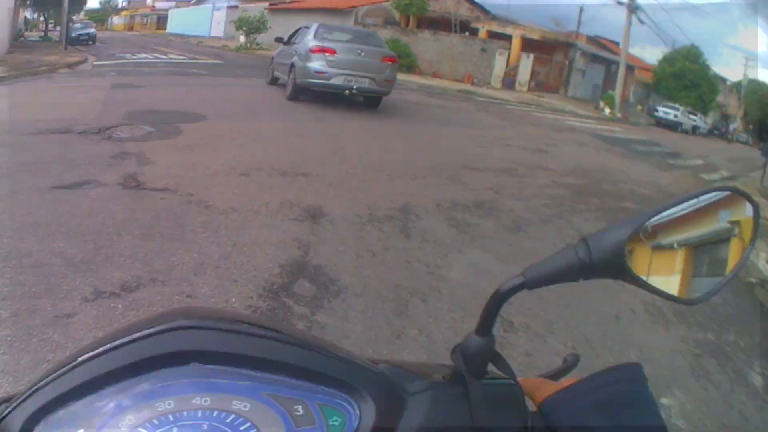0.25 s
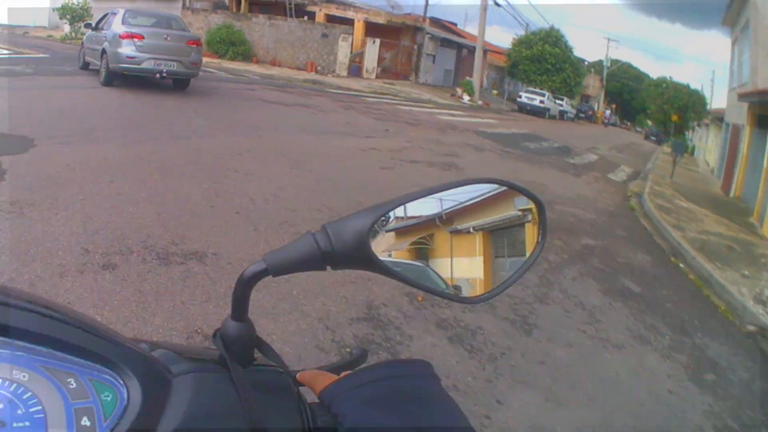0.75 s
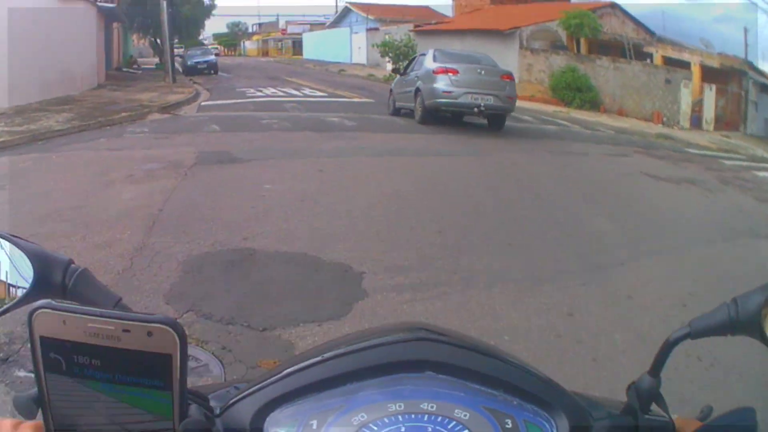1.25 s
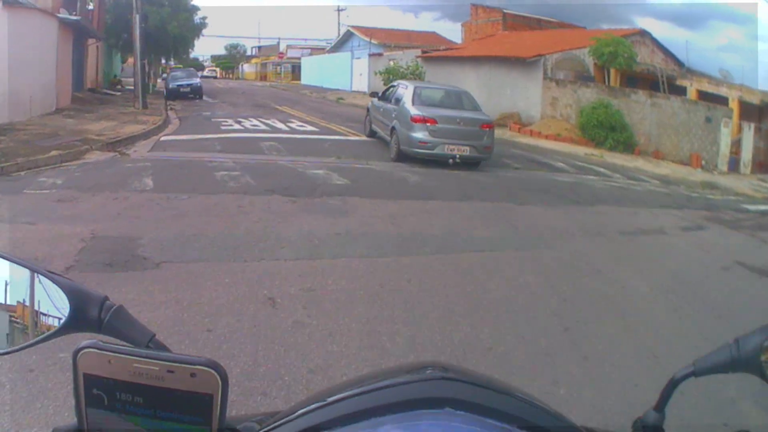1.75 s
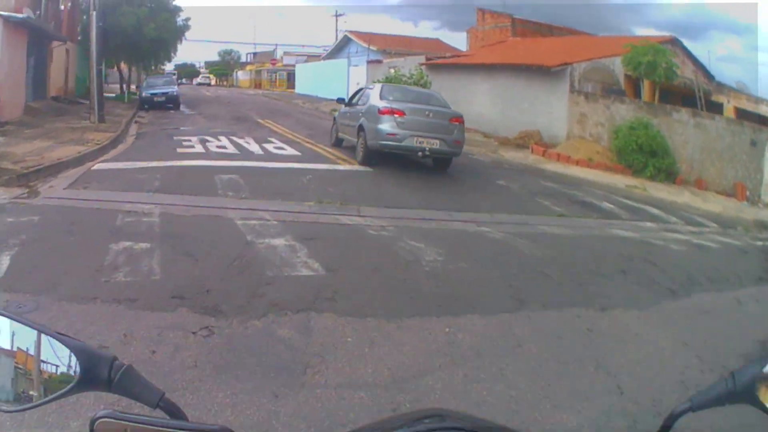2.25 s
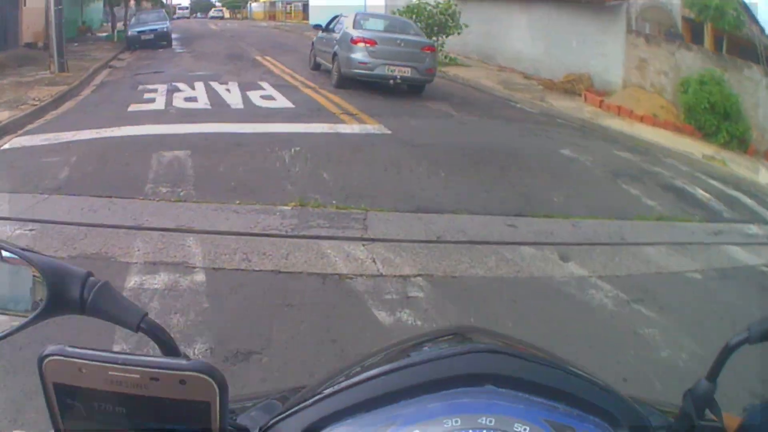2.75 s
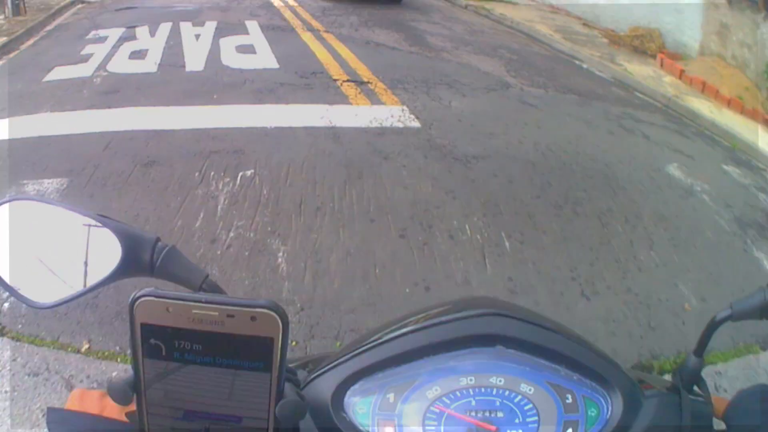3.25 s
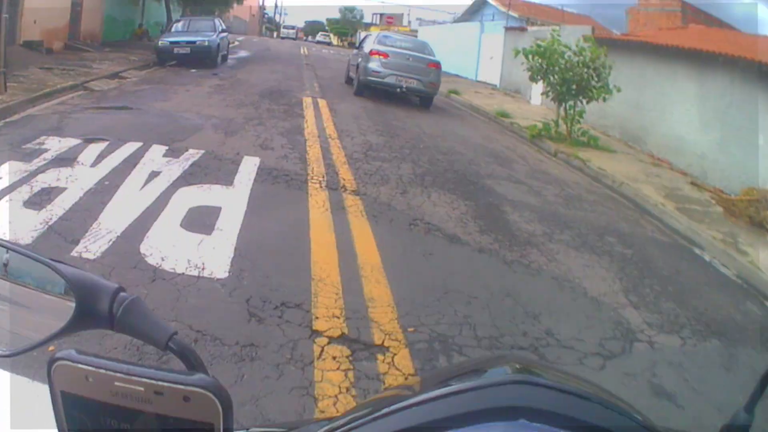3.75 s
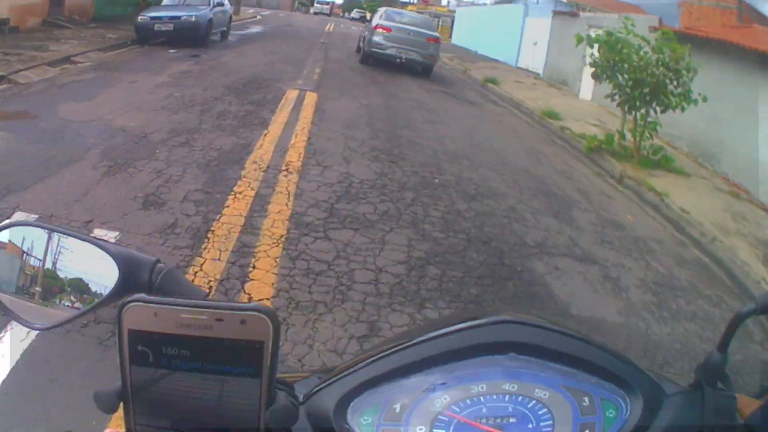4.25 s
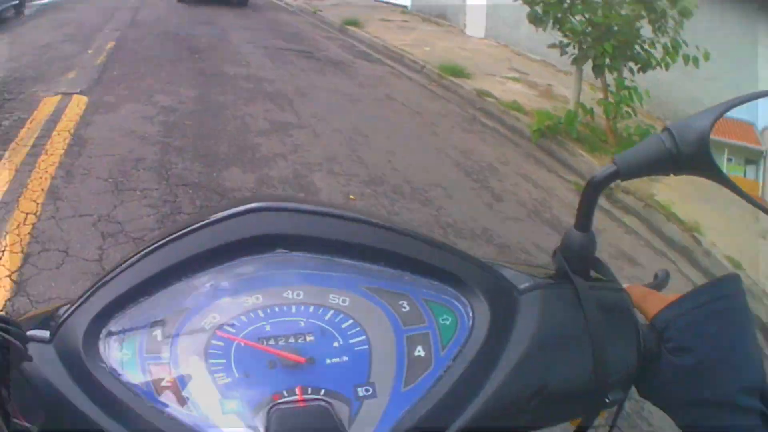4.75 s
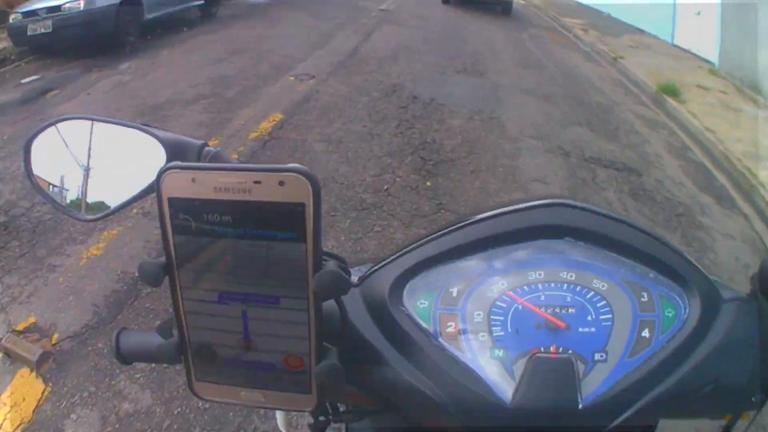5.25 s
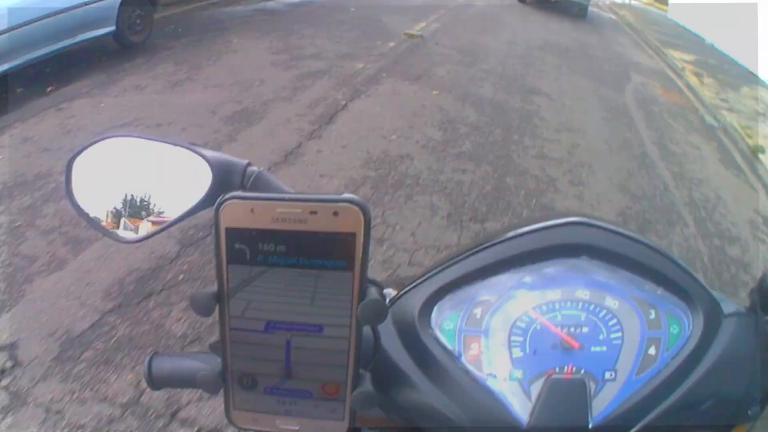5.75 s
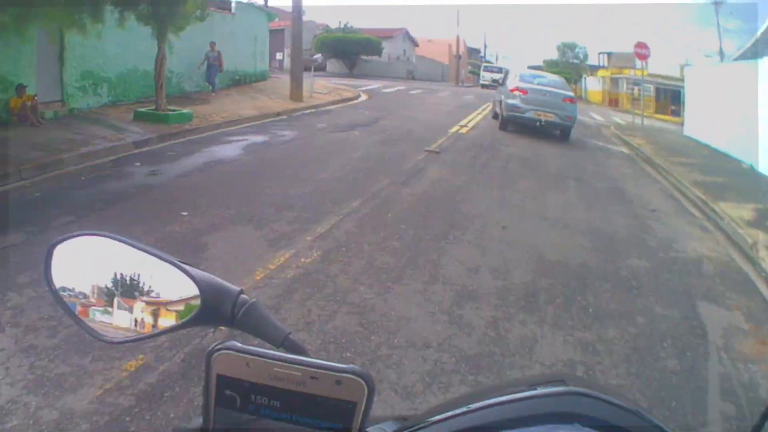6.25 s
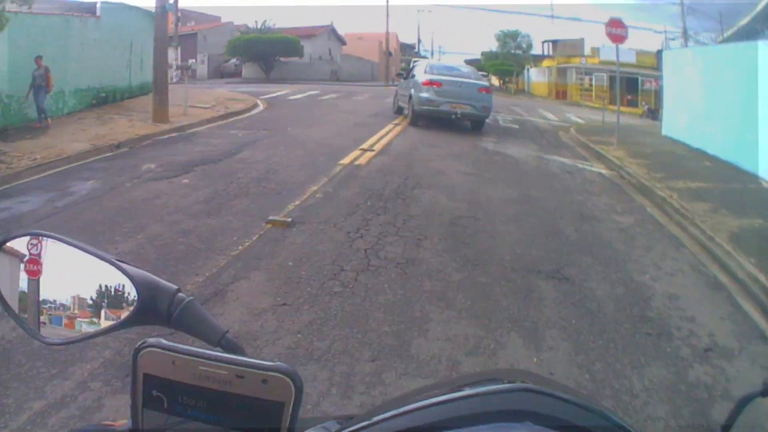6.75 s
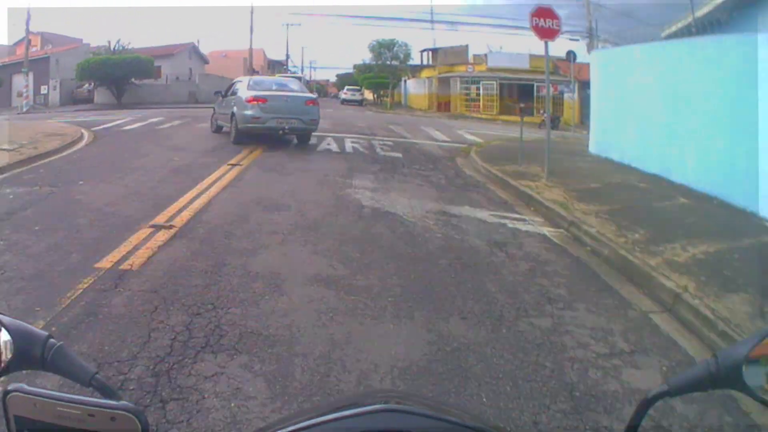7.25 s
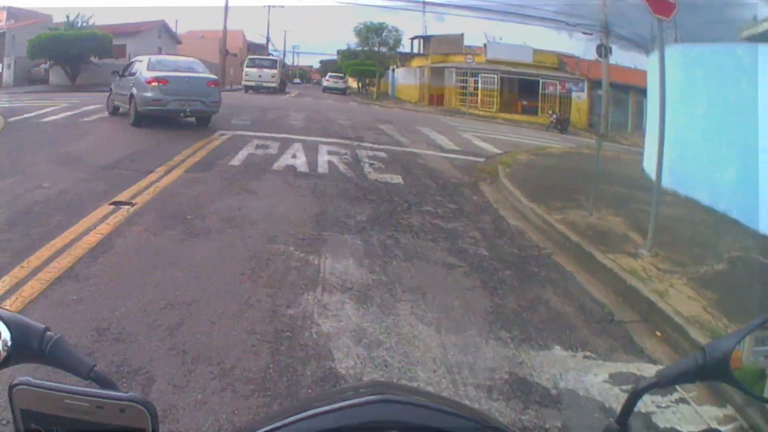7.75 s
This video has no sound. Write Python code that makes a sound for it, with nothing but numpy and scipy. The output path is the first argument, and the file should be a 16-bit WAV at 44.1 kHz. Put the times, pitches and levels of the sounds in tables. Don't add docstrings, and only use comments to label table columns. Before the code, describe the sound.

Close, dull onboard sound on an open residential street: low rapid exhaust thumps with rattling panels and thin metallic ringing. The scooter cruises, eases off, knocks once over a bump, then accelerates strongly with a nasal intake roar and gear whine up to a peak. It abruptly closes down, slows, briefly picks up and sputters irregularly, with soft rushing air throughout.

```python
import sys
import numpy as np
from scipy import signal
from scipy.io import wavfile
from scipy.ndimage import uniform_filter1d

SR = 44100
rng = np.random.default_rng(int(sys.argv[2]) if len(sys.argv) > 2 else 0)


def attenuation_scalar(level_db):
    decades = np.asarray(level_db, float) / 20
    return 10 ** decades


def to_wav(s):
    ch = np.atleast_2d(s).T
    pcm = np.round(np.clip(ch, -1, 1) * 32767)
    wavfile.write(sys.argv[1], SR, pcm.astype(np.int16))


N = 352359
MUFFLE_HZ = 3240


def steady(x, size=6000):
    power = uniform_filter1d(uniform_filter1d(x ** 2, size), size)
    return x / np.sqrt(power + 1e-12)


def in_time(rows):
    s, value = np.transpose(rows)
    return np.interp(np.arange(N) / SR, s, value)


def bumps(rows):
    t = np.arange(N) / SR
    return sum(height * np.exp(-.5 * ((t - s) / width) ** 2) for s, height, width in rows)


def drift(rate):
    r = np.exp(-80 * np.pi * rate / SR)
    slow = signal.lfilter([1], [1, -2 * r, r * r], rng.standard_normal(N // 40 + 2002))[2000:]
    return np.interp(np.arange(N) / 40, np.arange(len(slow)), slow / slow.std())


def resonate(x, modes, order=1, centre_hz=1):
    out, cycles = 0, np.cumsum(centre_hz * np.ones(N)) / SR
    for k, (share, width_hz, level_db) in enumerate(modes):
        spin = np.exp(2j * np.pi * share * cycles)
        r = np.exp(-np.pi * width_hz / SR)
        y = (x + 1e-18) / spin
        for _ in range(order):
            y = signal.lfilter([1 - r], [1, -r], y)
        out = out + (-1) ** k * attenuation_scalar(level_db) * 2 * (y * spin).imag
    return out


def pulses(turns, late, spread_db, jitter_s):
    at = np.flatnonzero(np.diff(np.floor(turns - late)))
    chance = rng.standard_normal((400, 2))[:len(at)]
    moved = at + (chance[:, 0] * jitter_s * SR).astype(int)
    out = np.zeros(N)
    out[np.clip(moved, 0, N - 1)] = attenuation_scalar(0.2 * spread_db[at] * chance[:, 1])
    return out


def gusts(turns, late, sharp):
    return np.exp(sharp * (np.cos(2 * np.pi * (turns - late)) - 1))


def piped(turns, modes, late, uneven_db, breath, order, centre_hz=1):
    beats = steady(pulses(turns, late, uneven_db, jitter_s=.00005))
    flow = breath * rng.standard_normal(N)
    return steady(resonate(beats + flow, modes, order=order, centre_hz=centre_hz))


def crank():
    # (time [s], speed [firings/s])
    firing_curve = [(0.0, 26.44), (0.343, 29.07), (0.652, 29.13), (1.254, 29.02), (1.523, 32.76),
                    (1.689, 33.51), (1.952, 30.05), (2.352, 30.37), (2.723, 29.45), (3.085, 25.36),
                    (3.612, 30.87), (4.549, 38.07), (5.489, 44.77), (5.873, 37.02), (6.168, 27.86),
                    (6.635, 30.78), (7.204, 31.41), (7.99, 29.13)]
    # (time [s], gain [firings/s], width [s])
    surge_list = [
        (0.86, -1.817, 0.108),
        (2.056, -2.815, 0.036),
        (2.24, 1.049, 0.08),
        (3.391, 6.631, 0.11),
        (4.7, 0.496, 0.13),
        (6.379, 4.744, 0.069),
        (7.49, -1.706, 0.104),
    ]
    rate = in_time(firing_curve) + bumps(surge_list)
    return rate, np.cumsum(rate) / SR - .4


def throttle():
    # (time [s], level [dB])
    throttle_curve = [(0.0, -13), (1.33, -13), (1.65, -22), (1.74, -33.5), (3.03, -34), (3.4, -15.5),
                      (3.63, -21.5), (3.67, -12), (4.56, -7.5), (4.78, -10), (5.36, -8.5), (5.5, -14),
                      (5.58, -37.5), (6.25, -33.5), (6.4, -29), (7.32, -22), (7.45, -33.5), (7.99, -31)]
    roar_db = in_time(throttle_curve)
    shut_db, cracked_db, half_db, open_db = -35, -27, -24, -16
    cracked = np.clip((roar_db - shut_db) / (cracked_db - shut_db), 0, 1)
    wide = np.clip((roar_db - half_db) / (open_db - half_db), 0, 1)
    cracked, wide = uniform_filter1d([cracked, wide], size=3000, mode="nearest")
    return roar_db, cracked, wide


def law(engine, shut, cracked, wide, per_firing):
    rate, cracked_share, wide_share = engine
    return shut + cracked * cracked_share + wide * wide_share + per_firing * (rate - 30)


def road(turns, tyre_db, hiss_db):
    # (frequency [Hz], density [dB per Hz])
    road_spectrum = [(40, -25), (90, -14), (300, -9.5), (500, -19), (1020, -22.5), (1300, -34),
                     (2020, -26.5), (2600, -40), (3300, -48.5), (3900, -39.5), (5000, -36.5), (8300, -38),
                     (10700, -39), (15500, -55)]
    out, edges = 0, 40 * 2 ** np.arange(0, 8.7, 1 / 3)
    white, together = rng.standard_normal((2, N)), drift(1.3)
    hz, level_db = np.transpose(road_spectrum)
    for k, (low, high) in enumerate(zip(edges, edges[1:])):
        sos = signal.butter(3, [low, high], "band", fs=SR, output="sos")
        band = signal.sosfilt(sos, white[k % 2])
        at_db = np.interp(np.log(low * high) / 2, np.log(hz), level_db)
        at_db = at_db + (tyre_db if low < MUFFLE_HZ else hiss_db)
        out = out + attenuation_scalar(at_db + 0.38 * together + 1.4 * drift(18.0)) * band
    return out * (1 + .35 * gusts(turns, .12, sharp=2.2))


def knocks():
    # (time [s], peak level [dB])
    knock_list = [
        (3.113, -17),
    ]
    clicks = np.zeros(N)
    for s, level_db in knock_list:
        clicks[round(s * SR)] = attenuation_scalar(level_db + 36)
    return resonate(clicks, [(974, 190, 0.031), (1084, 35, 0.0026)])


def covers():
    # (frequency [Hz], width [Hz], level [dB])
    cover_modes = [(1703, 16, 0), (1797, 20, 0)]
    # (level [dB], one per cover)
    rest_levels = (-53, -51.5)
    # (time [s], gain [dB], width [s])
    singing_spells = [
        [(1.3, 8, 0.22), (3.85, 10, 0.088), (5.35, 12.5, 0.15), (6.5, 10.5, 0.46), (7.45, 8, 0.19)],
        [(1.1, 10.5, 0.31), (2.5, 5, 0.33), (3.4, 5.5, 0.13), (4.2, 3.5, 0.21), (7.1, 7, 0.57)],
    ]
    out = 0
    for mode, rest_db, spells in zip(cover_modes, rest_levels, singing_spells):
        ring = steady(resonate(rng.standard_normal(N), [mode]), size=20000)
        out = out + attenuation_scalar(rest_db + bumps(spells) + 2 * drift(3.3)) * ring
    return out


def frame(turns, engine):
    # (multiple of the firing rate, level law (shut [dB], cracked [dB], wide [dB], speed [dB s]))
    frame_orders = [(2, (-36, -5.5, 7.5, 0.34)), (3, (-32, -13, 2, 1.09))]
    out = 0
    for k, row_db in frame_orders:
        level_db = law(engine, *row_db) + 2.7 * drift(2.5)
        out = out + attenuation_scalar(level_db) * np.sin(2 * np.pi * k * turns)
    return out


def rattle(turns):
    # (frequency [Hz], width [Hz], level [dB])
    panel_modes = [(1127, 45, 3), (1500, 62, -4), (1730, 190, -10.5), (2037, 48, 2), (2260, 36, -25.5),
                   (2780, 130, -13)]
    gate = .65 + gusts(turns, .17, sharp=2.5) + .3 * gusts(turns, .7, sharp=2.2)
    shake = rng.standard_normal(N) * gate
    panels = sum(attenuation_scalar(2 * drift(0.58)) * resonate(shake, [mode]) for mode in panel_modes)
    return steady(panels, size=14000)


def shudder():
    # (time [s], gain [dB], width [s])
    shudder_list = [
        (1.3, 3.5, 0.26),
        (3.4, 4.5, 0.21),
        (3.48, 3, 0.031),
        (3.95, 7, 0.34),
        (5.45, 3, 0.049),
        (6.41, 1.5, 0.038),
        (7.15, 2.5, 0.18),
        (7.8, 4.5, .3),
    ]
    return bumps(shudder_list)


def whine(turns):
    # (start [s], length [s], level [dB])
    pull_list = [
        (0.848, .62, -37.5),
        (2.2, 0.21, -47),
        (3.468, .85, -38.5),
        (4.786, 0.8, -37.5),
    ]
    t, idle_db, fade_s = np.arange(N) / SR, -57.5, 0.11
    level_db = idle_db + 2.0 * drift(21.0)
    for s, length, pull_db in pull_list:
        share = np.clip(np.minimum(t - s, s + length - t) / fade_s + .5, 0, 1)
        level_db = level_db + share * (pull_db - idle_db)
    load = 1 + gusts(turns, .3, sharp=2)
    twist = .6 * np.sin(2 * np.pi * turns) + .8 * drift(20)
    return attenuation_scalar(level_db) * load * np.sin(2 * np.pi * 34 * turns + twist)


def airbox(turns, engine, uneven_db):
    # (share of the centre pitch, width [Hz], level [dB])
    airbox_modes = [(0.853, 36, -1), (0.996, 28.37, 7), (1.17, 38.2, -5.5), (1.3, 39.44, -26.5)]
    # (time [s], shift [Hz], width [s])
    gulp_list = [
        (3.42, -27.5, 0.15),
    ]
    centre_hz = law(engine, 316.5, 7.5, -34.5, 1.0) + bumps(gulp_list)
    late = law(engine, -.19, -.14, .575, -.015)
    return piped(turns, airbox_modes, late, uneven_db, breath=.02, order=2, centre_hz=centre_hz)


def burning(turns):
    # (time [s], level [dB])
    misfire_list = [(2.815, -6), (2.96, -3), (3.075, -6), (6.048, 3), (6.184, -5), (6.255, -5), (7.374, -5),
                    (7.407, 3), (7.44, 2), (7.475, -4), (7.51, -6), (7.615, -7), (7.648, 5), (7.682, -2),
                    (7.715, -6), (7.749, 3), (7.884, -2), (7.918, 3)]
    cycle = np.floor(turns + .25).astype(int) + 2
    gains_db = np.zeros(cycle.max() + 1)
    for s, level_db in misfire_list:
        gains_db[cycle[int(s * SR)]] = level_db
    return attenuation_scalar(uniform_filter1d(gains_db[cycle], size=150))


def reflected(x, lag_s=0.00652, level_db=-10.0):
    return x + attenuation_scalar(level_db) * np.roll(x, int(lag_s * SR))


def tail_pipe(turns, engine, uneven_db, launch):
    # (frequency [Hz], width [Hz], level [dB])
    crack_modes = [(490.3, 91, 3.5), (682, 56, 1.5), (766, 130, -8)]
    # (frequency [Hz], width [Hz], level [dB])
    rasp_modes = [(1070, 95, 2), (1520, 430, -4)]
    crack = piped(turns, crack_modes, -.15, uneven_db, breath=.05, order=1)
    rasp = piped(turns, rasp_modes, -.15, uneven_db, breath=.05, order=1)
    crack_db = law(engine, -45.5, 10, 3, 0.51) + 3 * launch
    rasp_db = law(engine, -64, 4.5, 1, 1.37)
    return attenuation_scalar(crack_db) * reflected(crack) + attenuation_scalar(rasp_db) * rasp


def silencer(turns, engine, uneven_db, launch):
    # (share of the centre pitch, width [Hz], level [dB])
    silencer_modes = [(.76, 27, -8.5), (1, 24, 0.5), (1.241, 28, -11)]
    # (time [s], level [dB])
    pressure_curve = [(0.0, -24), (0.6, -18), (2.13, -22.5), (2.45, -21), (3.03, -23.5), (3.36, -17),
                      (4.18, -16.5), (4.74, -32.5), (4.96, -20.5), (5.52, -36), (5.58, -19.5), (5.76, -19),
                      (6.25, -30.5), (6.3, -24), (7.05, -19.5), (7.68, -24.5), (7.92, -21), (7.99, -22.5)]
    late = law(engine, -.275, 0, -.055, -.024) + .43 * launch
    centre_hz = law(engine, 151, 10.9, 4, 0.81)
    thump = piped(turns, silencer_modes, late, uneven_db, breath=.035, order=2, centre_hz=centre_hz)
    return attenuation_scalar(in_time(pressure_curve) + 1.0) * thump


def exhaust(turns, engine, uneven_db):
    # (time [s], share, width [s])
    launch_list = [
        (4.05, 1, .28),
    ]
    launch = bumps(launch_list)
    thump = silencer(turns, engine, uneven_db, launch)
    return burning(turns) * (thump + tail_pipe(turns, engine, uneven_db, launch))


def running(x, turns):
    size = np.searchsorted(turns, turns[0] + 1)
    borrowed = np.clip(4 - 4 * (turns - turns[0]), 0, 1)
    second = np.roll(x, -size) * np.tanh(np.arange(N) / 8 + .5)
    return x + borrowed * (second - x)


def scene():
    rate, turns = crank()
    roar_db, cracked, wide = throttle()
    engine = rate, cracked, wide
    uneven_db = 3 + (1.2 - 3) * cracked
    shudder_db = shudder()
    rattle_db = law(engine, -38, 2.5, -1.5, 0.2554) + shudder_db
    hiss_db = law(engine, -72.5, 2.5, -2.5, 0.33) + 0.83 * shudder_db
    air = road(turns, rattle_db + 34, hiss_db + 55.5)
    body = knocks() + covers() + frame(turns, engine) + attenuation_scalar(rattle_db - 7) * rattle(turns) + whine(turns)
    intake = attenuation_scalar(roar_db - 1.9 * (2 - wide)) * airbox(turns, engine, uneven_db)
    return (air + body + running(intake + exhaust(turns, engine, uneven_db), turns))[None]


def low_pass(x):
    return signal.sosfilt(signal.butter(12, 15750, fs=SR, output="sos"), x)


def record(dry):
    x = signal.sosfilt(signal.butter(2, 68, "high", fs=SR, output="sos"), dry)
    muffled = signal.sosfilt(signal.butter(8, MUFFLE_HZ, fs=SR, output="sos"), x)
    treble = signal.sosfilt(signal.butter(4, MUFFLE_HZ, "high", fs=SR, output="sos"), x)
    x = muffled + attenuation_scalar(-12.0) * treble
    return low_pass(.9 * np.tanh(x / .9))


dry = scene()
out = record(dry)
to_wav(out)
```